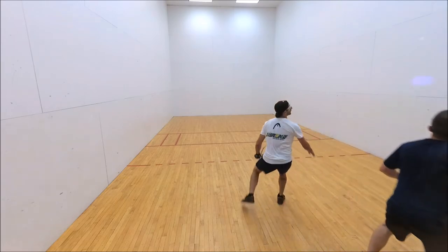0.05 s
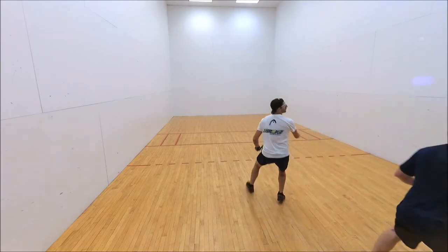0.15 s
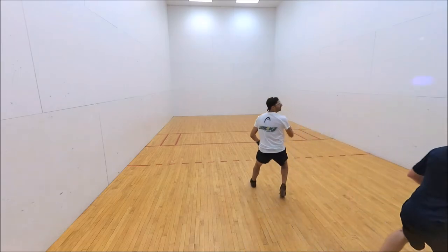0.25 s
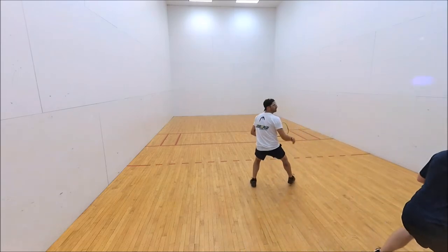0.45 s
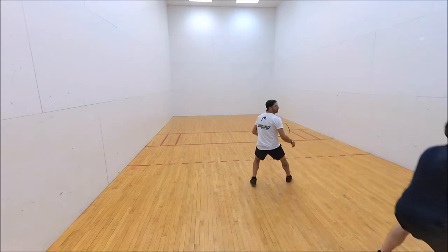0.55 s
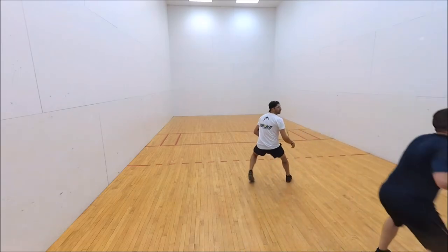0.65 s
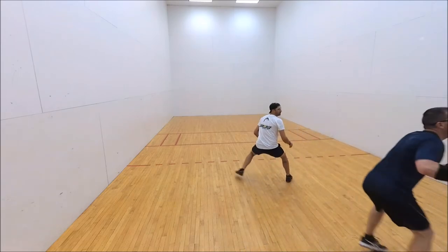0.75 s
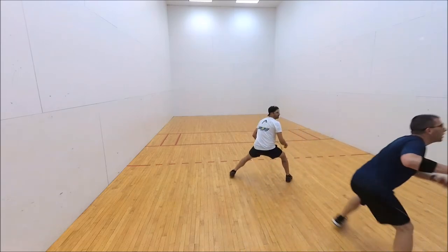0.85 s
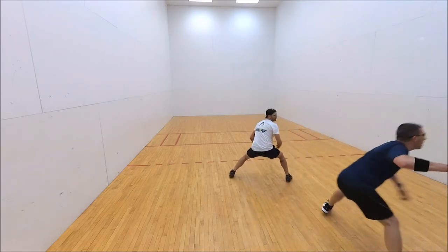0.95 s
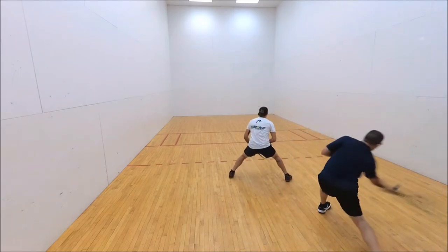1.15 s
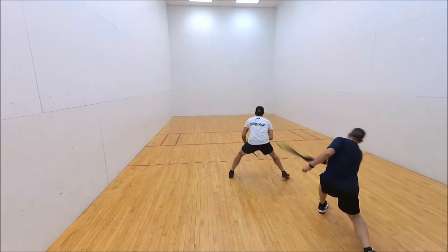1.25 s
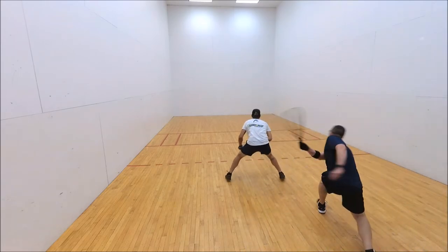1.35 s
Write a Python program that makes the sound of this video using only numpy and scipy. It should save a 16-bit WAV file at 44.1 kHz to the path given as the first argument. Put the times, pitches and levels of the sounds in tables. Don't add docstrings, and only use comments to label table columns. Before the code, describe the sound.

Sharp racquetball hit in a bare indoor court, dense ringing echo, then soft bounces and a shoe tap

```python
import sys
import numpy as np
from scipy import signal
from scipy.fft import rfft, irfft, next_fast_len
from scipy.io import wavfile

SR = 44100
rng = np.random.default_rng(int(sys.argv[2]) if len(sys.argv) > 2 else 0)


def invert_db(x):
    u = np.asarray(x, float) / 20
    return 10 ** u


def pcm_store(signal):
    levels = np.round(np.clip(np.atleast_2d(signal), -1, 1) * 32767)
    wavfile.write(sys.argv[1], SR, levels.astype(np.int16).T)


N = 61739
TIME = np.arange(N) / SR
FFT = next_fast_len(N + 8192)
HZ = np.maximum(np.arange(FFT // 2 + 1) * SR / FFT, 1)

# (level [dB], low edge [Hz], high edge [Hz], decay share [ratio])
CRACKS = [
    (-13.5, 197, 1460, 0.66),
    (-15, 346, 3870, 0.92),
    (-7, 110, 1440, 1.25),
    (-17, 174, 3370, 1.36),
    (-21, 410, 2600, 1.4),
    (-12.5, 200, 990, 1.24),
    (-19, 1000, 5500, 0.72),
]


def impacts():
    # (time [s], level [dB], echo build-up [s], echo hold [s])
    events = [
        (.2004, 11, 0.0031, 0.015),
        (.207, 6.5, 0.0083, 0.033),
        (0.45, -33, 0.018, 0.036),
        (.714, -17.5, 0.016, 0.029),
        (1.241, -20, 0.0065, 0.0052),
        (1.272, -20.5, 0.017, 0.019),
        (1.309, -20, 0.0072, 0.056),
        (1.6, -40.5, 0.0084, 0.0057),
        (0.553, -38, .04, 0.073),
    ]
    struck = (0, 1, 1, 2, 3, 5, 4, 5, 6)
    total = 0
    for (start, db, rise, hold), kind in zip(events, struck):
        decay_share = CRACKS[kind][3]
        path = rfft(court(start, rise, hold, decay_share), FFT)
        total = total + invert_db(db + 14) * path * contact(kind)
    return irfft(total, FFT)[:, :N]


def contact(kind):
    # (resonance [Hz], width [Hz], level [dB])
    racquet = [(423, 50, -15), (795, 60, 2), (940, 90, -7), (1530, 200, -14), (2900, 300, -18)]
    # (resonance [Hz], width [Hz], level [dB])
    wall = [(423, 28, -13.5), (694, 21, -4.5), (790, 55, -13), (1079.5, 63, 4.5), (1195, 32, -2.5),
            (1488, 84, -0.5), (1870, 42, -9), (2207, 66, -5.5), (2538, 92, -15), (5020, 300, -32.5)]
    # (resonance [Hz], width [Hz], level [dB])
    floor = [(170, 23, -10), (292, 63, -1.5), (546, 23, -12.5), (983, 47, 1), (1283, 173, -3.5),
             (1550, 70, -41), (2260, 1500, -28.5), (3830, 810, -18.5), (7580, 840, -26.5)]
    # (resonance [Hz], width [Hz], level [dB])
    bounce = [(260, 120, -13.5), (650, 120, 1.5), (1060, 93, 6.5), (1420, 130, -5.5), (1593, 240, -8.5),
              (2155, 82, -8), (2820, 37, -38)]
    # (resonance [Hz], width [Hz], level [dB])
    rebound = [(425, 73, -15), (924, 56, 2), (1030, 68, 10.5), (1820, 63, -9), (2900, 120, -40)]
    # (resonance [Hz], width [Hz], level [dB])
    sole = [(324, 51, -11), (780, 60, -3), (859, 64, 7.5), (1720, 150, -27)]
    # (resonance [Hz], width [Hz], level [dB])
    scuff = [(1440, 80, 8), (4500, 620, -5.5)]
    modes = (racquet, wall, floor, bounce, rebound, sole, scuff)[kind]
    ring = 0
    for k, (f, width, db) in enumerate(modes):
        damping = 1j * HZ * width
        ring = ring + (-1) ** k * invert_db(db) * damping / (f * f - HZ ** 2 + damping)
    crack_db, low_hz, high_hz, _ = CRACKS[kind]
    crack = invert_db(crack_db) / (1 - 1j * low_hz / HZ) ** 2 / (1 + 1j * HZ / high_hz) ** 2
    return ring + crack


def court(start, rise, hold, decay_share):
    # (frequency [Hz], quick T60 [s], slow T60 [s], slow part [dB])
    decay = [(61, 1, 1.7, -43), (333.3, 0.34, 1.48, -16.5), (780, 0.42, 1.4, -27), (1060, 0.37, 2.37, -23),
             (2420, 0.46, 1.31, -24), (3870, 0.34, 2.8, -24.5), (8000, 0.46, 1.0, -21.5),
             (14000, 0.17, .6, -26)]
    echoes_per_s, echo_growth, scatter_db = 1385, 12000, 1
    flutter_db, flutter_hz, direct_db = 1.5, 54.55, -5
    age = np.maximum(TIME - start, 0)
    density = np.clip((echoes_per_s + echo_growth * age * 10) / SR, 0, 1)
    draw = rng.random((2, N))
    size = rng.standard_normal((2, N)) * invert_db(scatter_db * rng.standard_normal((2, N)))
    present = np.clip((density - draw) * 200, 0, 1)
    echoes = rfft(size * present / np.sqrt(density) * (age > 0), FFT)
    delay = np.exp(-2j * np.pi * HZ * (start + rise))
    echoes = echoes + invert_db(direct_db) * delay * np.array([[1], [.3]])

    late = np.maximum(age - rise - hold, 0) / decay_share
    flutter = walk(flutter_hz)
    out = 0
    for hz, part in bands(echoes):
        quick = invert_db(-60 * late / curve(decay, hz))
        slow = invert_db(curve(decay, hz, axis=3) - 60 * late / curve(decay, hz, axis=2))
        out = out + part * (quick + slow) * invert_db(flutter_db * (.7 * flutter + .7 * walk(40)))
    return out * np.clip(age / rise, 0, 1) ** 2


def air():
    # (frequency [Hz], density [dB per Hz])
    tilt = [(25, -50), (125, -8), (400, -3.5), (850, 3.5), (1500, -2.5), (3050, -11), (4500, -13.5),
            (7000, -21.5)]
    level_db, flicker_db = -37, 1.8
    noise = rfft(rng.standard_normal((2, N)), FFT) * invert_db(curve(tilt, HZ))
    rush = sum(part * invert_db(flicker_db * walk(4)) for hz, part in bands(noise))
    return invert_db(level_db) * rush / np.sqrt(np.mean(rush ** 2))


def lamp_hum():
    level = np.sqrt(2) * invert_db(-50 + .8 * walk(6))
    return level * np.sin(2 * np.pi * 120 * TIME) * np.array([[1], [0]])


def ports(pair):
    # (frequency [Hz], level [dB])
    unlike = [(25, 2), (70, -13), (400, -20), (1000, -19), (2000, -10), (4000, -4), (8000, -7), (12000, -8)]
    # (frequency [Hz], phase [rad])
    port_phase = [(100, -.03), (1000, -.3), (3000, -.75), (6000, -1.0), (12000, -2.1)]
    shared, other = rfft(pair, FFT)
    other = other * invert_db(curve(unlike, HZ))
    turn = np.exp(.5j * curve(port_phase, HZ))
    return irfft(np.array([(shared + other) * turn, (shared - other) / turn]), FFT)[:, :N]


def curve(table, hz, axis=1):
    table = np.array(table)
    return np.interp(np.log(hz), np.log(table[:, 0]), table[:, axis])


def walk(rate):
    return 1.2 * np.interp(TIME * rate, np.arange(400), rng.standard_normal(400))


def bands(spectrum):
    for hz in 30 * 2 ** np.arange(0, 9.6, .5):
        octaves = np.log2(HZ / hz)
        part = np.cos(np.pi / 2 * np.clip(2 * octaves, -1, 1)) ** 2
        yield hz, irfft(spectrum * part, FFT)[:, :N]


def scene():
    # (frequency [Hz], gain [dB])
    response = [(25, 16), (90, 3), (2800, 0), (3400, -2.5), (4200, -4.5), (5200, -4.5), (8000, -6.5),
                (13000, -2.5)]
    hiss = invert_db(-62.5) * rng.standard_normal((2, N))
    sound = impacts() + air() + lamp_hum()
    heard = irfft(rfft(sound, FFT) * invert_db(curve(response, HZ)), FFT)[:, :N]
    return ports(heard + hiss)


def roll_off(x):
    return signal.sosfilt(signal.butter(12, 15250, fs=SR, output="sos"), x)


def record(dry):
    knee = 7.0
    x = dry / (1 + np.abs(dry) ** knee) ** (1 / knee)
    low_cut = signal.butter(1, 50, "high", fs=SR, output="sos")
    x = signal.sosfilt(low_cut, x)
    return roll_off(0.9 * x)


dry = scene()
out = record(dry)
pcm_store(out)
```